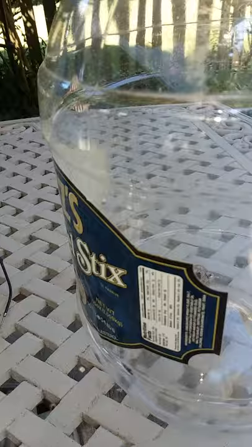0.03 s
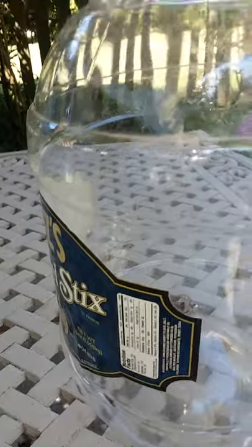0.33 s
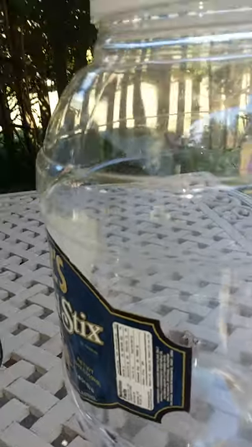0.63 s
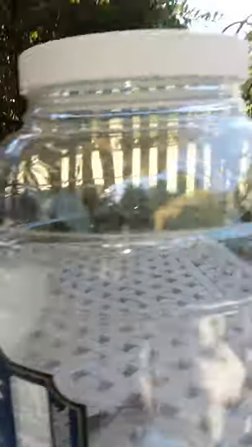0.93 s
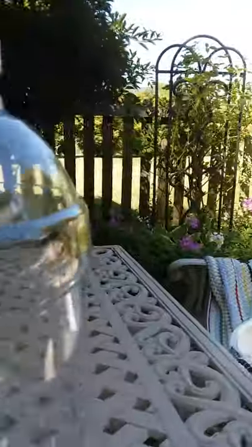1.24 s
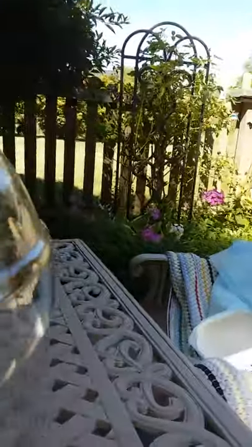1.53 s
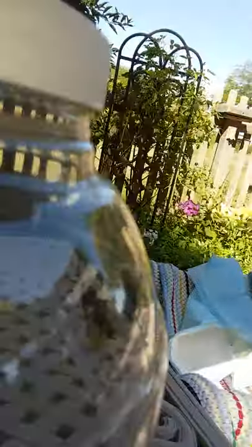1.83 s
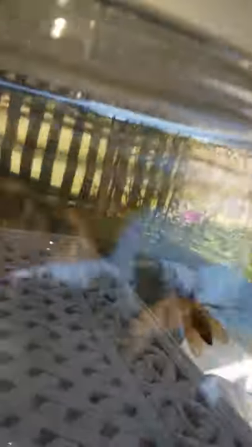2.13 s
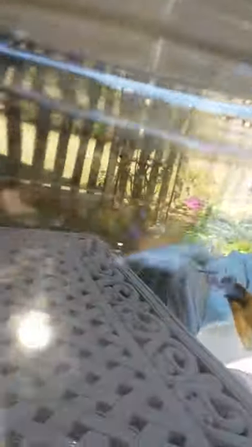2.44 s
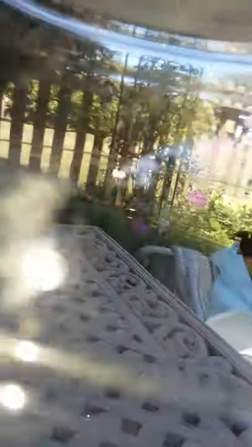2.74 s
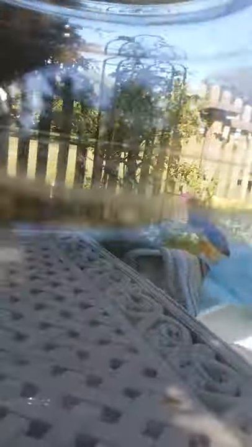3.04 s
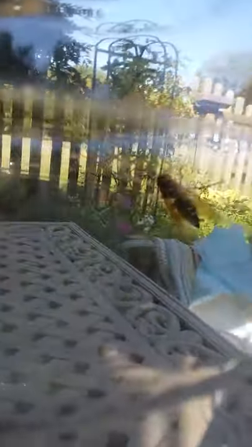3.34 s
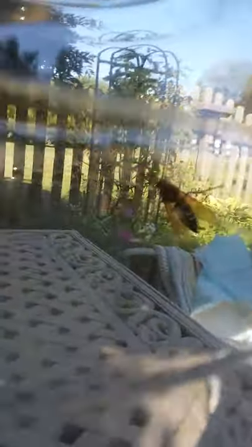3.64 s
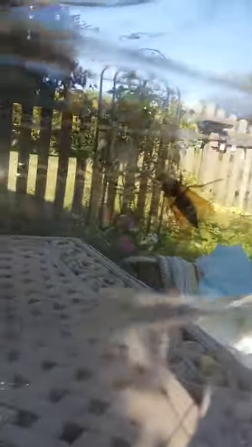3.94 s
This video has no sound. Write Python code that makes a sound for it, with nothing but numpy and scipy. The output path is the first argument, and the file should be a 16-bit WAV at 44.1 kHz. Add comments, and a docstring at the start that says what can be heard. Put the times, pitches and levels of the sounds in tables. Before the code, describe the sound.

An insect buzzes inside a plastic jar, a thin, steady whine that grows as the microphone moves closer. Distant traffic and a low rumble fill the garden behind it, with soft handling bumps and one late bird chirp.

```python
"""An insect buzzes in a clear plastic jar on a garden table: high overtones of its flight muscles' beat,
a thin, steady whine that grows as the microphone closes in. Behind it lie a wash of distant traffic with
one faint swelling tone, a low rumble and an engine hum; a small bird chirps once. The hand holding the
microphone brushes, ticks and bumps against it. The sound fades in after a short silence."""
import sys
import numpy as np
from scipy import signal
from scipy.fft import rfft, irfft, next_fast_len
from scipy.io import wavfile
from scipy.ndimage import uniform_filter1d, map_coordinates

SR = 44100
rng = np.random.default_rng(int(sys.argv[2]) if len(sys.argv) > 2 else 0)


def store_wav(level_fs):
    """Save 16-bit WAV to argv[1]."""
    pcm = np.round(np.clip(np.atleast_2d(level_fs), -1, 1) * 32767)
    wavfile.write(sys.argv[1], SR, pcm.T.astype(np.int16))


N = 176400
TIME_S = np.arange(N) / SR


def amp(db):
    """Decibels to gain."""
    return 10 ** (np.asarray(db) / 20)


def unit(x):
    """Scale to rms 1."""
    return x / np.sqrt(np.mean(x ** 2) + 1e-20)


def along(points, hz):
    """(Hz, value) points read on a log axis."""
    points_hz, values = np.transpose(points)
    return np.interp(np.log(hz + 1), np.log(points_hz + 1), values)


def curve(rows, t=TIME_S):
    """(s, value) points read at times t."""
    return np.interp(t, *np.transpose(rows))


def wobble(knots_per_s):
    """Smooth random curve."""
    coarse_s = np.linspace(0, N / SR, 2000)
    knots = map_coordinates(rng.standard_normal(1024), [coarse_s * knots_per_s], mode="wrap")
    return np.interp(TIME_S, coarse_s, knots)


def swell(centre_s, width_s, t=TIME_S):
    """Bell of height 1."""
    return np.exp(-.5 * ((t - centre_s) / width_s) ** 2)


def pan(db):
    """Stereo gains for a left minus right level."""
    return amp(np.array([[db], [-db]]) / 2)


def filtered(x, response):
    """Apply a gain given as a function of Hz."""
    size = next_fast_len(N + 8192)
    return irfft(rfft(x, size) * response(np.fft.rfftfreq(size, 1 / SR)), size)[..., :N]


def noise(spectrum, correlation=((100, 0),)):
    """Stereo noise of rms 1 from (Hz, dB) and (Hz, left-right correlation) points."""
    def mid_side_gains(hz):
        angle = np.arccos(np.clip(along(correlation, hz), -1, 1)) / 2
        return amp(along(spectrum, hz)) * [np.cos(angle), np.sin(angle)]
    mid, side = filtered(rng.standard_normal((2, N)), mid_side_gains)
    return unit(np.array([mid + side, mid - side]))


# Each row: time in seconds, relative level in dB.
TRAFFIC_LEVEL_DB = [(1.2, -45.5), (1.45, -44), (2.4, -47), (3.53, -46.5), (3.7, -48)]
# Each row: frequency in Hz, relative density in dB.
TRAFFIC_SPECTRUM_DB = [(100, -28), (250, -14), (380, -4.5), (660, -1), (1100, 1), (1700, -1.5),
                       (2100, -6.5), (2600, -14), (3400, -20.5), (9500, -35), (15700, -33)]
# Each row: frequency in Hz, left-right correlation.
TRAFFIC_CORRELATION = [(200, 0.89), (700, 0.77), (1400, 0.4), (2500, 0.015)]
# Each row: frequency in Hz, left minus right in dB.
TRAFFIC_PAN_DB = [(300, -1.7), (700, 0.2), (1400, -3.5), (2400, 1.5), (5000, 6)]

def traffic(trim_db=3):
    """Distant traffic: a noise wash, wider in the treble."""
    wash = noise(TRAFFIC_SPECTRUM_DB, TRAFFIC_CORRELATION)
    wash *= amp(curve(TRAFFIC_LEVEL_DB) + trim_db + 0.28 * wobble(14))
    return filtered(wash, lambda hz: amp(along(TRAFFIC_PAN_DB, hz) * np.array([[.5], [-.5]])))


# Each row: frequency in Hz, relative density in dB.
RUMBLE_SPECTRUM_DB = [(20, -31), (35, -29), (60, -3.5), (85, 2.5), (200, -5.5), (280, -10.5), (360, -21.5),
                      (700, -46.5)]

def rumble(level_db=-42):
    """Low, nearly mono noise."""
    lows = noise(RUMBLE_SPECTRUM_DB, correlation=[(30, 1.0), (80, 0.99), (180, 0.9905), (350, 0.9)])
    return lows * amp(level_db + 0.4 * wobble(11))


# Each row: time in seconds, level in dB.
HUM_LEVEL_DB = [(0.5, -46), (1.3, -42), (1.7, -47.5), (2.4, -46.5), (2.8, -45), (3.2, -51.5), (4.0, -46.5)]

def engine_hum(pitch_hz=130.9, drift_hz=1.26):
    """A far engine: one wavering sine."""
    phase = 2 * np.pi * np.cumsum(pitch_hz + drift_hz * wobble(9)) / SR
    return np.sqrt(2) * np.sin(phase) * amp(curve(HUM_LEVEL_DB) + 0.4 * wobble(7.42))


# Each row: time in seconds, beat rate in Hz.
BEAT_HZ = [(0.5, 202.64), (0.7, 206.47), (0.9, 209.07), (1.15, 211.09), (1.45, 212.8), (1.8, 213.99),
           (2.3, 214.53), (3.3, 215.09), (3.65, 215.34), (4.0, 215.77)]
# Each row: time in seconds, the insect's unrest from 0 to 1.
UNREST = [(1.1, 1), (1.5, .35), (2.4, .22)]
# Each row: time in seconds, rms timing scatter in beats.
JITTER_BEATS = [(1.2, .0009), (2.0, .0003), (3.62, .0003), (3.68, .0008), (3.78, .0008), (3.84, .0005)]
# Each row: frequency in Hz, relative density in dB.
JITTER_SPECTRUM_DB = [(40, 0), (200, -2), (500, -12), (1200, -60)]

def muscle_phase(flutter_hz=.45, flutter_per_s=28):
    """Flight muscle beat in radians: it quickens as the insect warms up, flutters until it settles."""
    beat_hz = curve(BEAT_HZ) + flutter_hz * curve(UNREST) * wobble(flutter_per_s)
    jitter = curve(JITTER_BEATS) * noise(JITTER_SPECTRUM_DB)[0]
    return 2 * np.pi * (np.cumsum(beat_hz) / SR + jitter)


# Each row: harmonic number, relative level in dB at arm's length, the same close up.
STRONG_OVERTONES_DB = [(24, -16, -14), (26, -24, -16), (27, -16, -24), (28, -22, -7), (29, -15, -25),
                       (30, -17, -2), (31, -6, -9), (32, -19, -12), (33, -4, -9), (34, -9, -8),
                       (35, -3, -1), (36, -6, -7), (37, -1, 0), (38, -2, -16), (39, -19, -11),
                       (40, -9, -21), (41, -15, -3), (42, -12, -18)]
# Each row: frequency in Hz, relative level in dB close up.
FAINT_OVERTONES_DB = [(4000, -31), (5400, -32), (9800, -17.5), (12500, -20.5), (14000, -27), (15700, -29.5)]
# Lobes and nulls the microphone crosses. Each row: centre and width in seconds, harmonic, gain in dB.
LOBES_DB = [(0.55, .17, 31, -12), (0.4, .2, 38, -12), (0.8, .35, 37, -12), (0.9, .05, 36, 8),
            (1.0, .35, 34, 8), (1.17, .13, 27, 5), (2.45, .2, 24, 5), (2.45, .17, 27, 7),
            (3.62, .08, 34, 8), (3.75, .15, 42, 7), (3.85, .15, 28, 5)]
# Each row: time in seconds, gain in dB above SIZZLE_HZ.
SIZZLE_DB = [(0.8, 0), (1.5, -2), (2.2, 0.5), (2.55, -1), (2.9, -3.5), (3.2, -3), (3.5, -2.5), (3.65, 1),
             (4.0, -1)]
# Each row: frequency in Hz, left channel's phase lead close up in radians.
LEAD_RAD = [(5100, 2), (6550, 4.5), (7500, 0.4), (8050, -1.5), (8400, -1.5)]
SIZZLE_HZ, ODD_OVER_EVEN_DB, FAINT_FAR_DB = 8330, 2.5, -6
WANDER_FAR, WANDER_NEAR, WANDER_FAINT, WANDER_PER_S = .32, .25, .7, 7
SWELL_FAR_DB, SWELL_NEAR_DB, SWELL_PER_S = 1.2, .8, 9

def jar_whine(phase, nearness, pan_db=4, flutter_db=4, flutter_per_s=28, scatter_rad=1.7):
    """Overtones leaving the jar, each drifting as the microphone moves round it; sum held near rms 1."""
    slow_s = np.linspace(0, N / SR, 500)
    unrest, sizzle = curve(UNREST, slow_s), amp(curve(SIZZLE_DB, slow_s))
    near = np.interp(slow_s, TIME_S, nearness)
    strong = {round(row[0]): row[1:] for row in STRONG_OVERTONES_DB}

    def drift(knots_per_s):
        return map_coordinates(rng.standard_normal(128), [slow_s * knots_per_s], mode="wrap")

    def by_distance(far, close):
        return far * (1 - near) + close * near

    whine = np.zeros((2, N))
    for k in range(20, 74):
        hz = k * BEAT_HZ[-1][1]
        faint_db = along(FAINT_OVERTONES_DB, hz) + ODD_OVER_EVEN_DB * (k % 2 - .5)
        far_db, near_db = strong.get(k, (faint_db + FAINT_FAR_DB, faint_db))
        level = by_distance(amp(far_db), amp(near_db)) * (sizzle if hz > SIZZLE_HZ else 1)
        swell_db = by_distance(SWELL_FAR_DB, SWELL_NEAR_DB) * drift(SWELL_PER_S)
        lobe_db = sum(db * swell(centre_s, width_s, slow_s)
                      for centre_s, width_s, harmonic, db in LOBES_DB if harmonic == k)
        level *= amp(swell_db + lobe_db + flutter_db * unrest * drift(flutter_per_s))
        depth = by_distance(WANDER_FAR, WANDER_NEAR) if k in strong else WANDER_FAINT
        lead_rad = by_distance(scatter_rad * rng.standard_normal(), along(LEAD_RAD, hz))
        start_rad = 2 * np.pi * rng.random()
        carrier = np.exp(-1j * k * phase)
        for channel, gain in enumerate(pan(pan_db)[:, 0]):
            wander = 1 + depth * (drift(WANDER_PER_S) + 1j * drift(WANDER_PER_S))
            path = gain * level * wander * np.exp(1j * (start_rad + channel * lead_rad))
            whine[channel] += (np.interp(TIME_S, slow_s, path) * carrier).real
    power = uniform_filter1d(np.mean(whine ** 2, axis=0), size=8000)
    return whine / np.sqrt(np.abs(power) + 1e-12)


# Each row: time in seconds, relative level in dB.
BUZZ_LEVEL_DB = [(0.38, -65), (0.48, -67), (0.6, -62.5), (0.9, -58), (1.15, -59.5), (1.39, -55),
                 (1.82, -51.5), (2.24, -54), (2.8, -47), (3.02, -46), (3.56, -43.5), (3.77, -44.5),
                 (3.89, -42), (4.0, -43.5)]
# Each row: time in seconds, microphone position from 0 (arm's length) to 1 (jar wall).
NEARNESS = [(2.3, 0), (2.7, 0.42), (3.05, 0.97)]
# Each row: frequency in Hz, relative density in dB.
RASP_SPECTRUM_DB = [(3500, -16), (5200, -17), (6400, 3), (7200, 6), (8100, 10), (9000, -4), (10500, -24),
                    (12500, -15), (15700, -30)]

def insect(rasp_far_db=-11, rasp_near_db=-19, trim_db=4):
    """The whine over a rasp that pulses with the muscle beat."""
    phase, nearness = muscle_phase(), curve(NEARNESS)
    whine = jar_whine(phase, nearness)
    rasp = unit(noise(RASP_SPECTRUM_DB) * (1 + 0.16 * np.cos(phase)))
    rasp *= amp(rasp_far_db + (rasp_near_db - rasp_far_db) * nearness)
    return amp(curve(BUZZ_LEVEL_DB) + trim_db) * (whine + rasp)


# Each row: centre in seconds, width in seconds, level in dB, bright share from 0 to 1.
BRUSHES = [(0.476, 0.031, -41.5, 0.19), (0.645, 0.047, -49, 0.27), (1.65, 0.06, -50, 0.8)]
# Each row of both: frequency in Hz, relative density in dB.
DULL_SPECTRUM_DB = [(600, -2.5), (1800, 6), (4200, -0.5), (5800, -12.5), (9000, -14), (13000, -9.5),
                    (15700, -12)]
BRIGHT_SPECTRUM_DB = [(5000, -19), (9000, -5), (13000, 0), (15700, 9)]

def hand_brushes(dull_pan_db=-16):
    """Skin rubs the microphone casing in soft swells."""
    dull = noise(DULL_SPECTRUM_DB) * pan(dull_pan_db)
    bright = noise(BRIGHT_SPECTRUM_DB)
    return sum(amp(db) * swell(centre_s, width_s) * ((1 - share) * dull + share * bright)
               for centre_s, width_s, db, share in BRUSHES)


# Each row: start in seconds, peak in dB, centre in Hz, width in octaves, left minus right in dB.
TICKS = [(0.7876, -23.5, 13000, 0.7, -10), (0.9032, -37, 3700, 0.75, 0), (1.366, -39, 1700, .6, 0)]

def grip_ticks(tail_t60_s=.003, tail_db=-1):
    """Dry ticks of the grip: band-passed impulses with short noise tails."""
    out = np.zeros((2, N))
    for start_s, peak_db, centre_hz, octaves, pan_db in TICKS:
        decay = (TIME_S >= start_s) * amp(tail_db - 60 * np.abs(TIME_S - start_s) / tail_t60_s)
        burst = rng.standard_normal((2, N)) * decay
        burst[:, round(start_s * SR)] += 1
        tick = filtered(burst, lambda hz: np.exp(-.5 * (np.log2((hz + 1) / centre_hz) / octaves) ** 2))
        balance = pan(pan_db) / pan(pan_db).max()
        out += amp(peak_db) * balance * tick / np.abs(tick).max()
    return out


# Each row: centre in seconds, width in seconds, level in dB.
BUMPS = [(1.3, 0.016, -44), (1.4, 0.057, -41), (1.595, 0.017, -43), (2.92, .06, -46.5),
         (3.635, 0.021, -39.5), (3.725, 0.042, -42)]
# Each row: frequency in Hz, relative density in dB.
BUMP_SPECTRUM_DB = [(30, -33), (70, -2.5), (270, -6.5), (600, -32), (3000, -90)]

def hand_bumps():
    """The hand shifts its hold: dull thuds through the casing."""
    envelope = sum(amp(db) * swell(centre_s, width_s) for centre_s, width_s, db in BUMPS)
    return noise(BUMP_SPECTRUM_DB, correlation=[(100, 1.0)]) * envelope


# Each row: frequency in Hz, relative density in dB.
DRONE_SPECTRUM_DB = [(560, -70), (625, -3), (650, 0), (675, -3), (750, -70)]

def traffic_drone(centre_s=1.57, width_s=0.21, level_db=-51):
    """A faint tone of narrow-band noise swells once in the traffic."""
    return noise(DRONE_SPECTRUM_DB, TRAFFIC_CORRELATION) * amp(level_db) * swell(centre_s, width_s)


# Each row: start and length in seconds, first, middle and last pitch in Hz, level in dB.
SYLLABLES = [(3.159, 0.019, 4300, 4510, 4660, -55), (3.172, 0.014, 5100, 5250, 5100, -57),
             (3.172, 0.028, 2450, 2640, 3215, -54), (3.197, 0.0262, 3150, 3299, 3530, -45),
             (3.207, 0.035, 3420, 3950, 3460, -46), (3.238, 0.0224, 3400, 3244, 3130, -47)]

def bird(warble_hz=167.6, warble_per_s=500, echo_t60_s=0.34, echo_db=3):
    """A two-voiced chirp of short gliding whistles, scattered by the garden."""
    call = np.zeros(N)
    for start_s, length_s, first_hz, middle_hz, last_hz, db in SYLLABLES:
        progress = np.clip((TIME_S - start_s) / length_s, 0, 1)
        parabola = np.polyfit([0, .5, 1], [first_hz, middle_hz, last_hz], 2)
        hz = np.polyval(parabola, progress) + warble_hz * wobble(warble_per_s)
        envelope = amp(db) * np.sqrt(np.abs(np.sin(np.pi * progress)))
        call += envelope * np.sin(2 * np.pi * np.cumsum(hz) / SR)
    tail = rng.standard_normal((2, SR // 2)) * amp(-60 * TIME_S[:SR // 2] / echo_t60_s)
    echo = signal.fftconvolve(call[None], tail / np.linalg.norm(tail[0]), axes=1)[:, :N]
    return call + amp(echo_db) * echo


def scene():
    """Jar, garden and hand together."""
    jar = insect()
    garden = traffic() + rumble() + engine_hum() + traffic_drone() + bird()
    hand = hand_brushes() + grip_ticks() + hand_bumps()
    return jar + garden + hand


# Each row: time in seconds, gain in dB.
FADE_DB = [(0.362, -80), (0.376, -30), (0.41, -17.5), (0.47, -13.5), (0.55, -7), (0.63, -3.5)]
CUTOFF_HZ = 15780

def record(dry):
    """Silence, then a fade-in; brick-wall low-pass."""
    fade = amp(curve(FADE_DB)) * (TIME_S > FADE_DB[0][0])
    return filtered(dry * fade, lambda hz: hz < CUTOFF_HZ)


dry = scene()
out = record(dry)
store_wav(out)
```